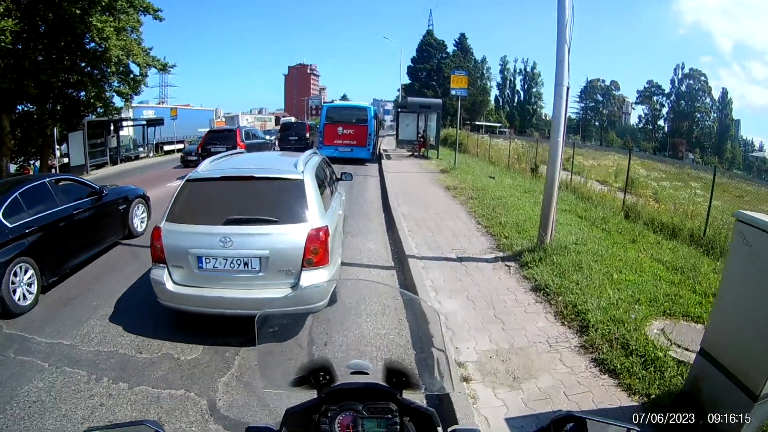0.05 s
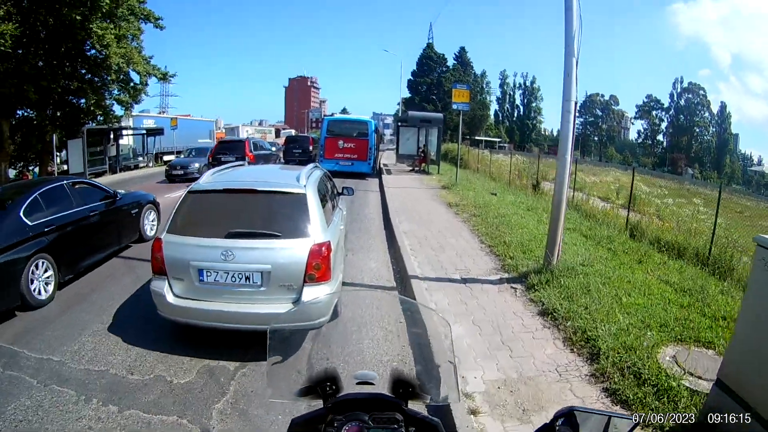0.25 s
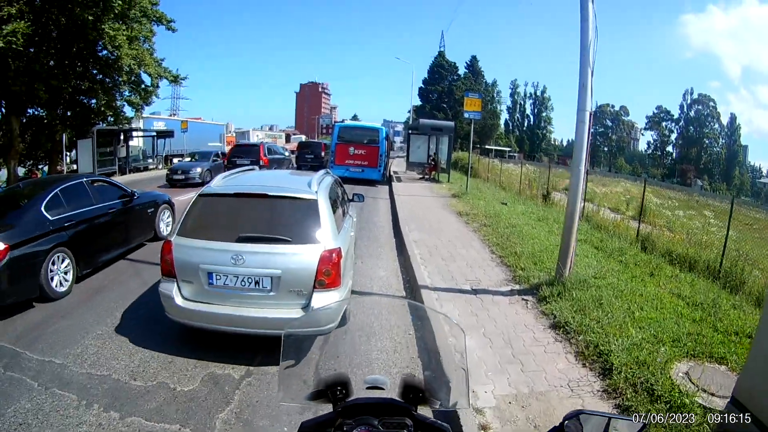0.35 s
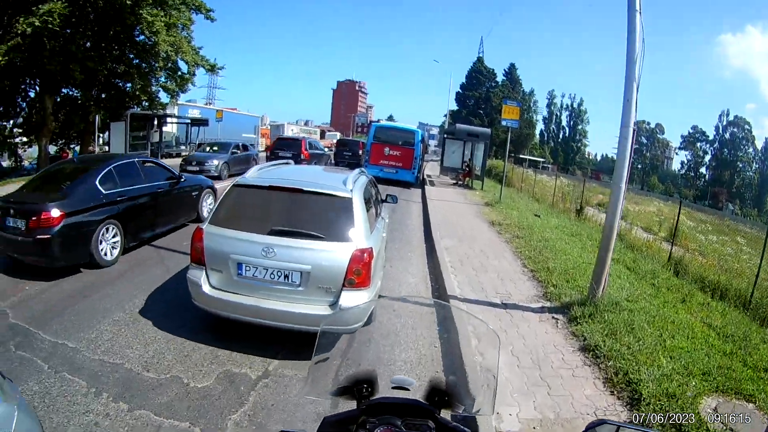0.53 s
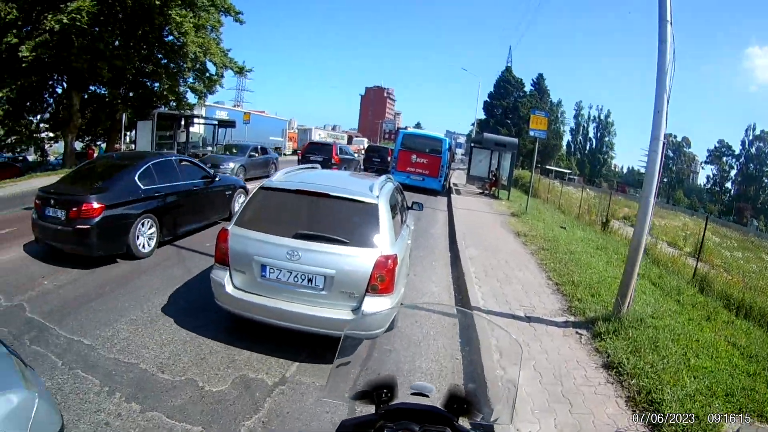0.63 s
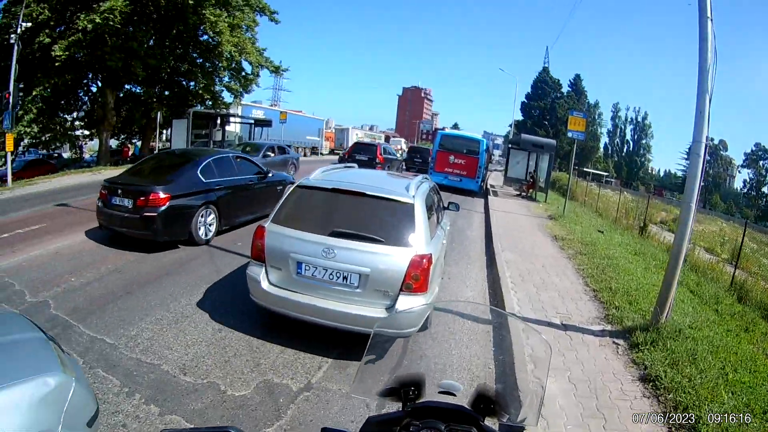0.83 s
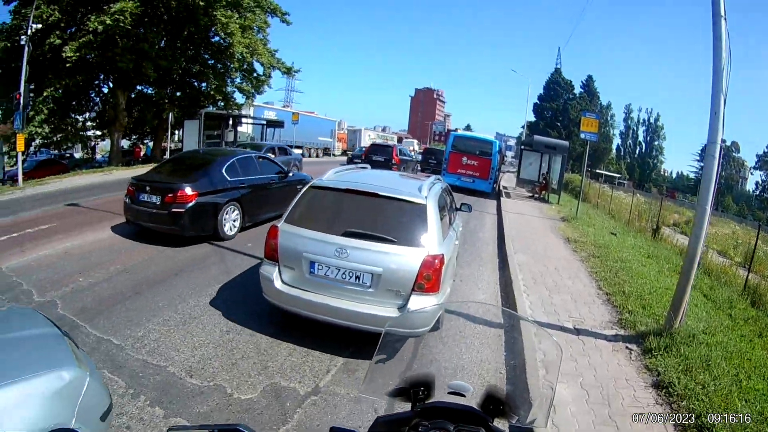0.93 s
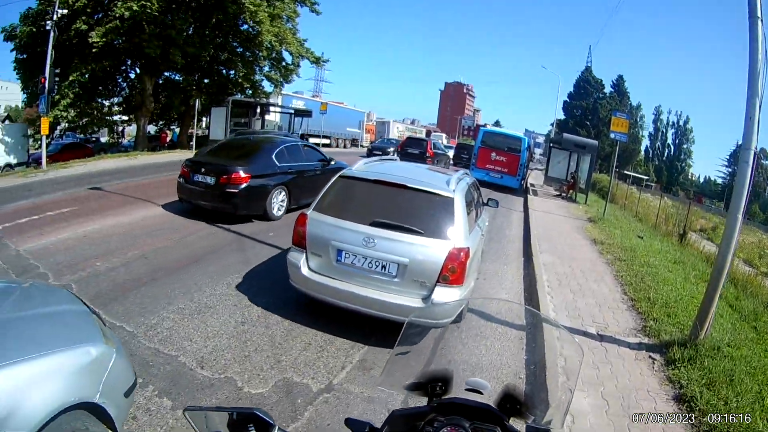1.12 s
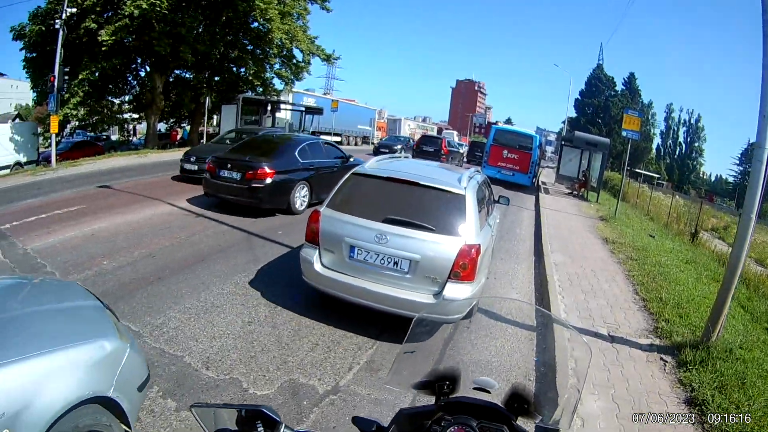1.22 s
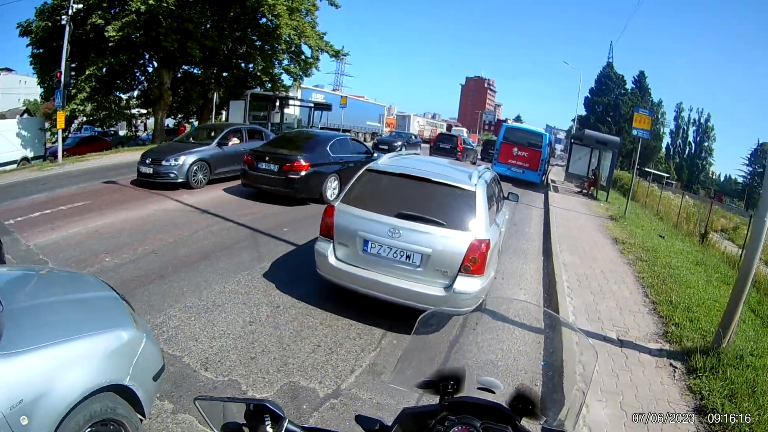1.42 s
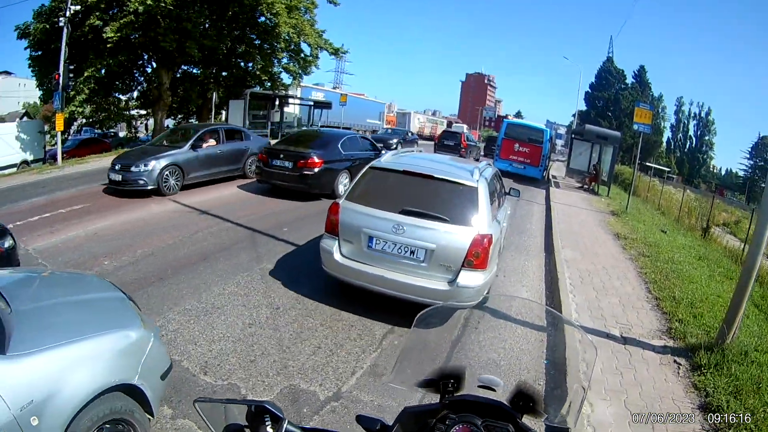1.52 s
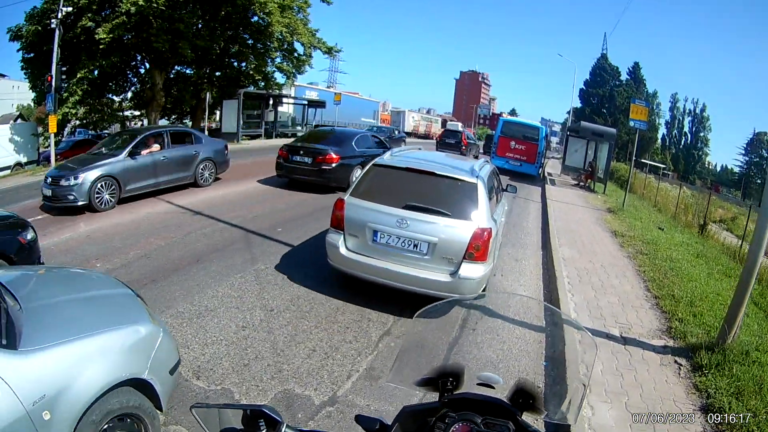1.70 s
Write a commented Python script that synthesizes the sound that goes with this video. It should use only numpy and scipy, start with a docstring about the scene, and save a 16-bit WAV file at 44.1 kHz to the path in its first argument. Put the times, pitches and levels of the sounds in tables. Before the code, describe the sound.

One brief mid-pitched horn beep, close and clear, above a quietly thudding idling motorcycle and traffic murmur.

```python
"""A street with queueing cars: a motorcycle rolls slowly past them, heard from the rider's position.
Its engine thuds just above idle: firings ring exhaust modes, and filtered noise swells with each one.
One electric horn toots once, a sum of harmonics; six moving reflections colour it, then a dull tail and echo.
Coloured noise makes the traffic murmur, with soft whirs and a faint hum later on, and air on the microphone.
Traffic and engine noise is weak above 3 kHz; faint hiss lies over everything."""
import sys
import numpy as np
from scipy import signal
from scipy.fft import rfft, irfft
from scipy.io import wavfile
from scipy.ndimage import uniform_filter1d, map_coordinates

SR = 44100
rng = np.random.default_rng(int(sys.argv[2]) if len(sys.argv) > 2 else 0)


def wav_out(sig):
    """Save sig, one row per channel (or a flat mono array), as 16-bit PCM at SR to the path in sys.argv[1]."""
    wavfile.write(sys.argv[1], SR, np.round(np.clip(np.atleast_2d(sig).T, -1, 1) * 32767).astype(np.int16))


N = 77175


def undb(db):
    """Decibels to gain."""
    return 10 ** (np.asarray(db) / 20)


def level(x, db):
    """Set the rms level."""
    return x * undb(db) / np.sqrt(np.mean(x ** 2))


def curve(t, rows):
    """Straight lines through (place, value) rows."""
    return np.interp(t, *np.array(rows).T)


def noise(spectrum):
    """White noise coloured by (Hz, dB) points, joined by straight lines over log frequency."""
    hz, db = np.array(spectrum).T
    bins_hz = np.maximum(np.fft.rfftfreq(N, 1 / SR), 1)
    gain = undb(np.interp(np.log(bins_hz), np.log(hz), db))
    return irfft(rfft(rng.standard_normal(N)) * gain, N)


def resonate(x, hz, width_hz):
    """One resonance, gain 1 at its centre."""
    b, a = signal.iirpeak(hz, hz / width_hz, fs=SR)
    return signal.lfilter(b, a, x)


def lowpass(x, hz, order=2):
    """Treble cut; a higher order is steeper."""
    return signal.sosfilt(signal.butter(order, hz, fs=SR, output="sos"), x)


def wander(rate):
    """Random drift, rms 1: `rate` random steps per second, smoothed over one step."""
    k = int(SR / rate)
    steps = np.repeat(rng.standard_normal(N // k + 1), k)
    return level(uniform_filter1d(steps, k)[:N], 0)


def ring(x, hz, t60_s):
    """One mode: every impulse starts a decaying sine."""
    pole = np.exp((2j * np.pi * hz - np.log(1000) / t60_s) / SR)
    return signal.lfilter([1], [1, -pole], x).imag


# Air on the microphone. Each row: frequency in Hz, spectral density in dB.
WIND_SPECTRUM = [(10, -23), (26, -0.5), (50, -2), (75, -9), (140, -29.5), (400, -69)]
WIND_DB, WIND_GUST_DB = -60, 3


def wind():
    """Moving air bumps softly against the microphone: low noise of wandering level."""
    gusts = undb(WIND_GUST_DB * wander(rate=9))
    return level(noise(WIND_SPECTRUM) * gusts, WIND_DB)


# Traffic murmur. Each row: frequency in Hz, spectral density in dB.
TRAFFIC_SPECTRUM = [(15, -8.5), (30, 4), (90, 2), (160, -0.5), (260, -2), (380, -1), (520, -4.5),
                    (780, -12), (1150, -10.5), (1600, -12.5), (2300, -16.5), (2900, -21.5), (3400, -29),
                    (4100, -44), (6000, -58)]
# Murmur level. Each row: time in seconds, level in dB.
TRAFFIC_LEVEL_DB = [(0, -50), (0.9, -50.5), (1.45, -48.5), (1.6, -48.5), (1.75, -50)]
# Soft whirs. Each row: peak time in s, half length in s, centre in Hz, width in Hz, level in dB.
WHIRS = [(1.21, 0.14, 1133, 230, -57.5), (1.365, 0.047, 1244, 420, -56.5), (1.69, 0.056, 360, 170, -52)]
HUM_HZ, HUM_AT_S, HUM_HALF_S, HUM_DB = 245, 1.68, 0.11, -51


def traffic(t):
    """The murmur of slow cars as coloured noise, with narrow-band whirs and a brief hum rising out of it."""
    out = level(noise(TRAFFIC_SPECTRUM), 0) * undb(curve(t, TRAFFIC_LEVEL_DB) + 0.5 * wander(rate=12))
    for at_s, half_s, hz, width_hz, db in WHIRS:
        band = rng.standard_normal(N)
        for _ in range(2):
            band = resonate(band, hz, width_hz)
        out = out + level(band, db) * np.exp(-((t - at_s) / half_s) ** 2)
    hum_hz = HUM_HZ * (1 + 0.0084 * wander(rate=17))
    hum = np.sin(2 * np.pi * np.cumsum(hum_hz) / SR)
    return out + undb(HUM_DB) * hum * np.exp(-((t - HUM_AT_S) / HUM_HALF_S) ** 2)


# Engine speed. Each row: time in seconds, firings per second.
FIRING_RATE = [(0, 37.0), (0.45, 37.05), (0.95, 37.25), (1.23, 37.9), (1.43, 37.05), (1.56, 36.55),
               (1.75, 36.7)]
# Exhaust modes. Each row: frequency in Hz, t60 in seconds, relative level in dB.
EXHAUST_MODES = [(79.6, 0.062, 16.5), (224.5, 0.04, -17.5), (358, 0.025, -20)]
# Valve gear and gas rush. Each row: frequency in Hz, spectral density in dB.
CLATTER_SPECTRUM = [(150, -2.5), (350, -21.5), (700, -7.5), (1300, -20), (2000, -0.5), (2700, -14.5),
                    (3300, -21.5), (4200, -38.5), (6000, -73)]
FIRST_FIRING_S, FIRING_SCATTER_S, FIRING_SCATTER_DB = 0.0158, 0.0002, 0.97  # scatters are rms
EXHAUST_DB, EXHAUST_LOW_HZ, EXHAUST_TOP_HZ = -44, 27, 715
MUFFLER_HZ = 1407  # the silencer dulls each firing above this
CLATTER_DB, CLATTER_SWELL = -62, 0.65


def engine(t):
    """Slightly uneven firings ring the exhaust; mechanical rush swells with each one."""
    cycles = np.cumsum(curve(t, FIRING_RATE)) / SR - FIRST_FIRING_S * FIRING_RATE[0][1]
    times_s = np.interp(np.arange(int(cycles[-1]) + 1), cycles, t)
    shift, strength = rng.standard_normal((len(times_s), 2)).T
    places = np.clip((times_s + FIRING_SCATTER_S * shift) * SR, 0, N - 1).astype(int)
    pulses = np.zeros(N)
    pulses[places] = undb(FIRING_SCATTER_DB * strength)

    thud = sum(undb(db) * ring(pulses, hz, t60_s) for hz, t60_s, db in EXHAUST_MODES)
    band = signal.butter(1, [EXHAUST_LOW_HZ, EXHAUST_TOP_HZ], "bandpass", fs=SR, output="sos")
    thud = lowpass(signal.sosfilt(band, thud), MUFFLER_HZ)
    clatter = noise(CLATTER_SPECTRUM) * (1 + CLATTER_SWELL * np.sin(2 * np.pi * cycles))
    return level(thud, EXHAUST_DB) + level(clatter, CLATTER_DB)


# Horn harmonics, first upward. Each row: level in dB, ring-out t60 in seconds.
HORN_PARTIALS = [(-29, 0.21), (-27.5, 0.046), (-28.5, 0.12), (-44.3, 0.07), (-37.5, 0.092), (-44.5, 0.11),
                 (-54, 0.22), (-65.5, 0.06), (-74, 0.046)]
# Level curve of the faint top harmonics. Each row: frequency in Hz, level in dB.
HORN_BUZZ = [(4750, -98.5), (5200, -94), (6100, -97), (7100, -89.5), (7600, -104), (8100, -103),
             (8600, -93), (9200, -90.5), (10000, -98)]
HORN_HZ, HORN_ON_S, HORN_OFF_S = 474.8, 0.2183, 0.4983
HORN_SCOOP, HORN_SETTLE_S = 0.07, 0.005  # the diaphragm starts flat by this share and pulls up to pitch
HORN_ATTACK_S, HORN_STAGGER_S = 0.016, 0.0018  # each higher harmonic enters later, by 8 ms at most
HORN_JITTER, HORN_BUZZ_T60_S = 0.00074, 0.1  # jitter: rms share of pitch
HORN_DISPERSION_RAD = 1.2  # the flare shifts the higher harmonics, smearing each beat of the diaphragm


def horn(t):
    """The buzzing diaphragm: harmonics enter one after another, hold and ring out, with a faint high buzz."""
    age_s, after_s = np.maximum(t - HORN_ON_S, 0), np.maximum(t - HORN_OFF_S, 0)
    scoop = HORN_SCOOP * np.exp(-age_s / HORN_SETTLE_S)
    hz = HORN_HZ * (1 - scoop + HORN_JITTER * wander(rate=290))
    phase = 2 * np.pi * np.cumsum(hz) / SR
    buzz = [(curve(n * HORN_HZ, HORN_BUZZ), HORN_BUZZ_T60_S) for n in range(10, 22)]
    out = 0
    for k, (db, t60_s) in enumerate(list(HORN_PARTIALS) + buzz):
        rise = np.clip((age_s - min(k * HORN_STAGGER_S, 0.008)) / HORN_ATTACK_S, 0, 1)
        fall = np.exp(-np.log(1000) * after_s / t60_s)
        tone = np.sin((k + 1) * phase - HORN_DISPERSION_RAD * k ** 2)
        out = out + undb(db) * rise * fall * tone
    return out


# Reflections of the horn. Each row: delay at mid-toot in ms, change of delay in ms per s, gain.
REFLECTIONS = [ (0.263, 1.357, 0.357), (0.682, 1.564, 0.169), (1.763, 1.343, 0.157), (2.362, -2.04, 0.254),
               (2.385, 4.585, 0.11), (4.55, 7.5, 0.09), ]
MID_TOOT_S = 0.37


def reflect(x, t):
    """Road and car bodies return the sound over paths that lengthen or shorten as the bike rolls."""
    out = x
    for delay_ms, drift_ms_per_s, gain in REFLECTIONS:
        late_s = (delay_ms + drift_ms_per_s * (t - MID_TOOT_S)) / 1000
        out = out + gain * map_coordinates(x, [(t - late_s) * SR], mode="constant")
    return out


# Tail and echo gains are those ahead of the damping.
STREET_DB, STREET_T60_S, STREET_LAG_S, STREET_DAMP_HZ = -20, 0.41, 0.049, 1080
FAR_ECHO_S, FAR_ECHO_DB = 0.09, -23


def street(x, t):
    """One far echo and a short diffuse tail from the cars and trees further off, both dull."""
    tail = rng.standard_normal(N) * np.exp(-np.log(1000) * t / STREET_T60_S) * (t > STREET_LAG_S)
    tail = tail / np.linalg.norm(tail)
    diffuse = undb(STREET_DB) * signal.fftconvolve(x, tail)[:N]
    echo = undb(FAR_ECHO_DB) * np.interp(t - FAR_ECHO_S, t, x)
    return lowpass(diffuse + echo, STREET_DAMP_HZ, order=8)


def scene():
    """Wind, traffic, engine and horn at the microphone."""
    t = np.arange(N) / SR
    toot = horn(t)
    mix = wind() + traffic(t) + engine(t) + reflect(toot, t) + street(toot, t)
    return mix[None]


# Microphone hiss. Each row: frequency in Hz, spectral density in dB.
HISS_SPECTRUM = [(1000, 0), (4500, 2.2), (7500, -1.39), (9500, 0.5), (12000, -2.8), (15500, 1.5)]
HISS_DB, TOP_HZ = -76.5, 15700  # hiss level ahead of the top cut


def record(dry):
    """The microphone adds faint hiss; a steep elliptic filter cuts the top."""
    steep = signal.ellip(10, 0.2, 70, TOP_HZ, fs=SR, output="sos")
    return signal.sosfilt(steep, dry + level(noise(HISS_SPECTRUM), HISS_DB))


dry = scene()
out = record(dry)
wav_out(out)
```